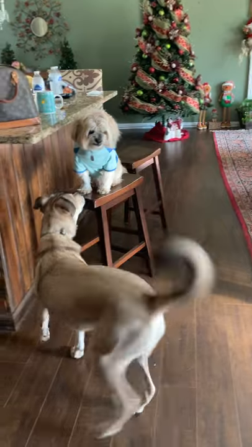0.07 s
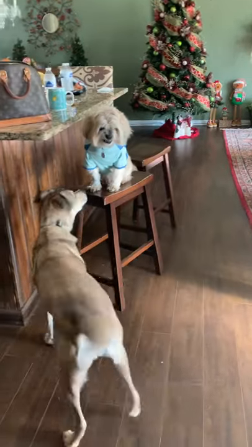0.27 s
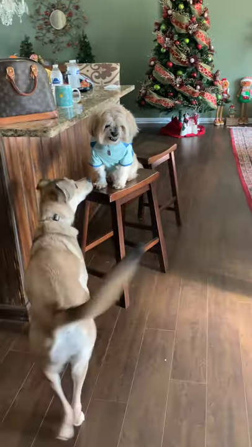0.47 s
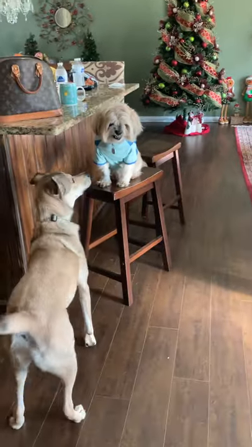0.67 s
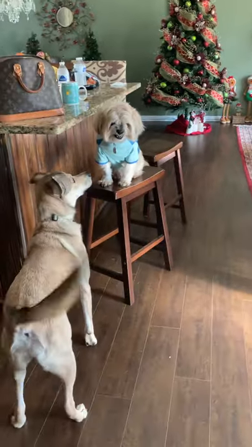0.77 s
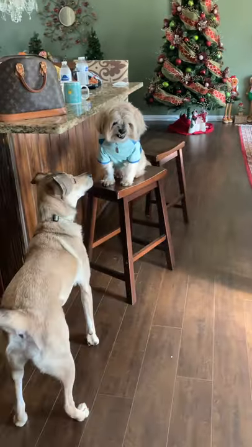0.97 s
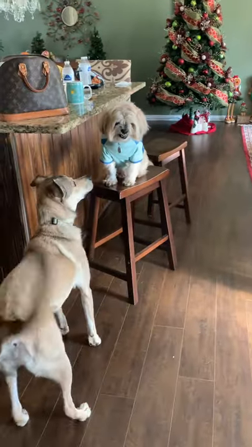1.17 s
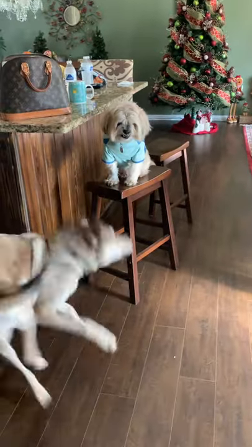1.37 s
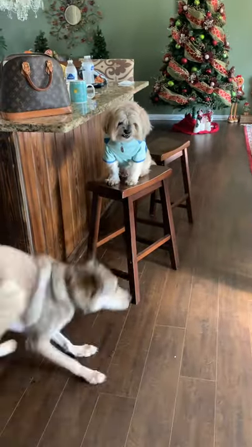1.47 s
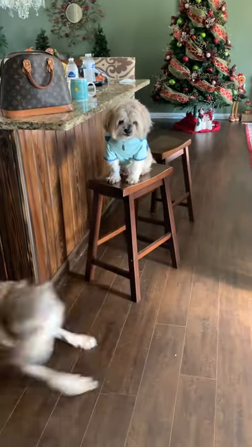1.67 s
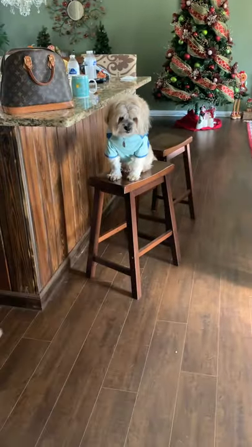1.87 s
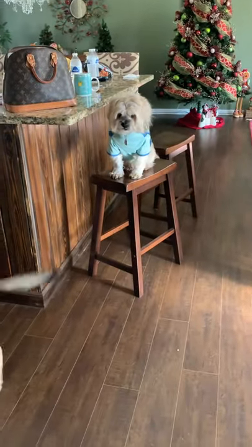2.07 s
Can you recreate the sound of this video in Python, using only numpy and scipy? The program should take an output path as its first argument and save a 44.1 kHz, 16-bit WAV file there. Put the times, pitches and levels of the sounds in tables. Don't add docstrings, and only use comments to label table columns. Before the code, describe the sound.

A dog's paws patter on an indoor wood floor, claws scrape, then two hard thumping landings

```python
import sys
import numpy as np
from scipy import signal
from scipy.fft import rfft, irfft, next_fast_len
from scipy.io import wavfile
from scipy.ndimage import uniform_filter1d

SR = 44100
rng = np.random.default_rng(int(sys.argv[2]) if len(sys.argv) > 2 else 0)


def gain_from_db(level_db):
    decades = np.asarray(level_db, float) / 20
    return 10 ** decades


def digitize_waveform(pressure):
    field = np.atleast_2d(pressure).T
    bounded = np.clip(field, -1, 1)
    quanta = np.round(bounded * 32767).astype(np.int16)
    wavfile.write(sys.argv[1], SR, quanta)


N = 93977

# freq_hz, level_db
AIR_SPECTRUM = [(25, -16), (60, -4), (100, -13.5), (200, -7.5), (450, -21.5), (750, -18.5), (1300, -41),
                (6000, -64), (14000, -48)]
# freq_hz, t60_s
ROOM_DECAY = [(60, 0.11), (250, 0.97), (1000, 0.62), (3000, 0.48), (7000, 0.36), (14000, 0.19)]
# freq_hz, level_db, t60_s
BOARD_MODES = [(71, 1, 0.3), (172, -39, 0.25), (223, -38, 0.74), (373.4, 6.5, 0.22), (580, -28, 0.26),
               (427.7, 4.5, 0.25), (790, -14, 0.1), (850, -4, 0.048), (970, -3.5, 0.022), (1450, -33, 0.12),
               (1600, -40, 0.18)]
# freq_hz, level_db
DULL_TONE = [(300, -11), (600, -7), (1500, -9.5), (2500, -6.5), (4500, -17.5), (7000, -26.5),
             (16000, -42.5)]
# freq_hz, level_db
BRIGHT_TONE = [(300, -34.5), (2300, -3.5), (3600, -1.5), (5500, -4), (7200, -4), (9500, -4), (13000, -7.5),
               (17000, -36)]
# freq_hz, level_db
THUMP_SPECTRUM = [(30, -25), (55, 2.5), (85, 5.5), (120, -15.5), (200, -15), (400, -32)]
# start_s, level_db, pitch_hz, decay_ms
BLOW_PINGS = [(0.0363, -40, 1608, 4.7), (.058, -25.5, 537, 3), (0.311, -25.5, 2010, 3.1),
              (.316, -39, 737, 3.5), (.358, -28, 2120, 2.1), (.362, -36.5, 905, 1.9),
              (1.005, -56, 3300, .6), (1.0055, -52, 4600, .5), (1.006, -54, 6100, .5),
              (.742, -57, 13000, .5), (.063, -34, 295, 3.3), (.109, -34.5, 235, 6.7), (.172, -35, 270, 8.7),
              (.227, -43, 190, 14), (.418, -37.5, 1930, 1.9), (.424, -41.5, 1100, 4.4),
              (.5715, -32, 2130, 2), (1.3695, -18.5, 533, 4.7), (1.514, -17, 957, 4.6),
              (1.545, -25.5, 385, 4.7), (1.665, -40, 760, 12), (1.71, -33, 770, 9.9), (1.76, -31.5, 750, 6),
              (1.80, -31.5, 428, 7.4), (1.85, -26.5, 346, 7.5), (2.005, -34, 1804, 12),
              (1.368, -14, 12800, 0.37), (1.368, -14, 15500, .3), (1.512, -13, 12700, 0.66),
              (1.59, -29, 111, 13), (1.612, -24, 166, 8.5), (1.60, -29.5, 402, 12), (.318, -32, 563, 6),
              (1.069, -44, 752, 12), (1.1708, -7, 3580, 0.37), (1.1707, -17.5, 8050, 0.67),
              (1.1933, -10.5, 6600, 0.74), (1.205, -10, 3930, .6), (1.224, -19.5, 7170, 3.2),
              (1.230, -19, 7640, 2.3), (1.253, -23, 8000, 0.66), (1.3704, -31, 7200, 1),
              (1.369, -19, 1410, 1.24), (1.5131, -9.5, 6400, 1.3), (1.513, -17, 1715, 4.1),
              (1.517, -16, 8100, 1.4), (1.516, -14, 370, 8.6)]
# time_s, level_db, brightness_0_to_1
DRAG_STROKES = [(.03, -48, 0.17), (.10, -58.5, 0.99), (.14, -64, 0.7), (.26, -75.5, 1), (0.502, -60.5, 1),
                (0.552, -48.5, 0.85), (.62, -54.5, 0.13), (.85, -67, 0), (.93, -83.5, 1),
                (1.118, -77, 0.74), (1.162, -35, 0.54), (1.239, -25, 0.84), (1.254, -31, 0.69),
                (1.275, -50, 0), (1.47, -40.5, 0.3), (1.499, -34.5, 0.74), (1.507, -40, 1),
                (1.53, -33.5, 0.53), (1.649, -33.5, 0.69), (1.722, -52, 0.64), (1.948, -49, 0.35),
                (2.048, -38.5, 0.56), (2.13, -54.5, 0.4)]
# start_s, level_db, decay_ms, brightness_0_to_1
CLAW_TICKS = [(.037, -44.5, 1.6, 0), (.095, -36, 6.4, 0.69), (.202, -44.5, 3, 0.76), (0.31, -27, 2.35, 0.1),
              (.358, -32, 5.1, 0), (0.417, -34.5, 1.7, 0.71), (.571, -33.5, 5.2, 0.37),
              (1.006, -72, 0.49, 0.9), (1.144, -37.5, 1.4, 0.5), (1.1707, -10, 1.1, 1),
              (1.1927, -14.5, 0.39, 1), (1.205, -23.5, 2.7, 0.41), (1.223, -39, 4.6, 0.75),
              (1.368, -16, 1.25, 0.88), (1.5116, -13.5, 2.4, 0.9), (1.516, -9.5, 1.84, 0.72),
              (1.696, -26.5, 6.1, 0.84), (1.753, -33, 3.3, 1), (1.848, -32.5, 5.6, 0.67),
              (2.008, -32, 4.7, 0.65)]
# start_s, level_db, pitch_hz, decay_ms
PLANK_KNOCKS = [(.037, -45.5, 1670, 5.2), (.058, -35, 560, 2.4), (.120, -50, 1220, 5.5),
                (.293, -47, 814, 7.9), (.311, -26.5, 2006, 7.2), (.315, -28.5, 697, 4.2),
                (.357, -27.5, 2000, 1.9), (.361, -27, 806, 2.4), (.417, -23.5, 2130, 2.4),
                (.422, -30.5, 940, 3.5), (.571, -27, 2252, 5.1), (1.068, -47, 730, 7.7),
                (1.145, -37, 585, 4.7), (1.367, -22, 786, 6.1), (1.512, -16.5, 1100, 3.9),
                (1.515, -20.5, 369, 5.6), (1.60, -33.5, 779, 14.6), (1.695, -34, 620, 4.5),
                (1.755, -32.5, 610, 3.2), (1.797, -33.5, 400, 11.3), (1.848, -29, 508, 3.1),
                (1.985, -37, 423, 13.4), (2.035, -36, 485, 5)]
# start_s, level_db, delay_s (at 1 Hz), tone_factor
PAD_LANDINGS = [(0.056, -29.5, 0.23, 1.25), (0.114, -32.5, .2, 1.1), (0.171, -38, .18, 2.34),
                (0.216, -55, 0.19, 2.2), (0.41, -37.5, .15, 2.16), (0.521, -40.5, .2, 1.43),
                (.562, -45.5, .16, 1), (1.171, -41, 0.29, 1.76), (1.204, -38, .24, 1.17),
                (1.28, -37, 0.17, 2.8), (1.369, -14.5, 0.25, 1.28), (1.402, -22.5, 0.15, 0.93),
                (1.429, -25, .16, 2), (1.477, -32, .16, 1.46), (1.509, -10.5, .28, 1.107),
                (1.581, -24, .14, 0.96), (1.652, -47, .18, 0.95), (1.705, -32.5, .24, 1.33),
                (1.786, -40, .2, 2.5), (1.839, -16, 0.3, 0.96), (2.021, -27, 0.26, 1.09),
                (2.094, -34, 0.26, 0.97)]
# freq_hz, phase_rad
PORT_PHASE = [(0, 0), (900, 1.2), (1650, 0), (2450, -3.1), (3400, -4.4), (5000, -9.4), (7300, -12.57),
              (12350, -18.85), (14400, -21.9), (17300, -22.3)]
# freq_hz, likeness_0_to_1
ROOM_LIKENESS = [(60, .985), (300, .8), (900, .5), (1500, .25), (2600, .45), (3700, .15), (5000, .72),
                 (9000, .94)]
# freq_hz, likeness_0_to_1
DIRECT_LIKENESS = [(300, 1), (1000, .85), (5000, .9), (13500, .93), (15000, .78)]


def evened(x):
    return x / np.sqrt(np.mean(x ** 2) + 1e-20)


def read(points, hz):
    f, value = np.transpose(points)
    return np.interp(np.log(hz + 1), np.log(f + 1), value)


def add(mix, start_s, sound):
    part = mix[round(start_s * SR):][:len(sound)]
    part += sound[:len(part)]


def colour(x, table):
    log_gain = np.log(gain_from_db(read(table, np.abs(np.fft.fftfreq(4096, 1 / SR)))))
    spectrum = np.exp(np.conj(signal.hilbert(log_gain)))
    taps = np.fft.ifft(spectrum).real[:2048]
    return signal.oaconvolve(x, taps / np.linalg.norm(taps))[:len(x)]


def background():
    air_db, hum_hz, hum_peak_db, waver_db = -61, 59.6, -48, 2
    air = np.array([evened(colour(a, AIR_SPECTRUM)) for a in rng.standard_normal((2, N))])
    waver = evened(uniform_filter1d(uniform_filter1d(rng.standard_normal(N), 3000), 3000))
    hum = gain_from_db(hum_peak_db + waver_db * waver) * np.sin(2 * np.pi * hum_hz * np.arange(N) / SR)
    return gain_from_db(air_db) * air + hum * np.array([[1], [0]])


def room(x):
    low_db, low_hz = -4, 190
    taps = np.zeros((2, SR))
    at = np.arange(200, SR - 20, 20) + rng.integers(0, 20, (2, (SR - 201) // 20))
    np.put_along_axis(taps, at, rng.choice([-1., 1.], at.shape), 1)
    hz, t, z = signal.stft(taps, SR, nperseg=512)
    hz = hz[:, None]
    z *= gain_from_db(-60 * t / read(ROOM_DECAY, hz) + low_db / (1 + (hz / low_hz) ** 2))
    tail = signal.istft(z, SR, nperseg=512)[1]
    tail[:, :200] = 0
    return signal.fftconvolve(x[None], tail / np.linalg.norm(tail[0]), axes=1)[:, :N]


def board_ring(x):
    t = np.arange(16000) / SR
    ring = np.zeros(len(t))
    for mode_hz, db, t60_s in BOARD_MODES:
        ring += gain_from_db(db - 60 * t / t60_s) * np.sin(2 * np.pi * mode_hz * t) * 14 / (t60_s * SR)
    return signal.fftconvolve(x, ring)[:N]


def pings():
    out, t = np.zeros(N), np.arange(3000) / SR
    for start_s, db, pitch_hz, decay_ms in BLOW_PINGS:
        u = t * 1000 / max(decay_ms, .1)
        envelope = np.minimum(6 * u, 1) * np.exp(-u)
        add(out, start_s, gain_from_db(db) * envelope * np.sin(2 * np.pi * pitch_hz * t))
    return out


def drag():
    grains_per_s, spread_db = 5200, 3.5
    time_s, db, bright = np.transpose(DRAG_STROKES)
    t = np.arange(N) / SR
    size = gain_from_db(spread_db * np.minimum(rng.exponential(1, N), 5))
    size *= rng.random(N) < grains_per_s / SR
    slips = evened(size * rng.standard_normal(N) + 0.83 * rng.standard_normal(N))
    slips *= gain_from_db(np.interp(t, time_s, db))
    b = np.clip(np.interp(t, time_s, bright), 0, 1)
    return colour(slips * (1 - b), DULL_TONE) + colour(slips * b, BRIGHT_TONE)


def claws():
    dull, bright, t = np.zeros(N), np.zeros(N), np.arange(800) / SR
    for start_s, db, decay_ms, brightness in CLAW_TICKS:
        noise = rng.standard_normal(800)
        burst = gain_from_db(db) * noise * np.exp(-t * 1000 / max(decay_ms, .1))
        share = np.clip(brightness, 0, 1) ** 2
        add(dull, start_s, burst * (1 - share))
        add(bright, start_s, burst * share)
    return colour(dull, DULL_TONE) + colour(bright, BRIGHT_TONE)


def landings(hz):
    out = np.zeros(N)
    for start_s, db, delay_s, tone in PAD_LANDINGS:
        band = (hz < 1200) * (hz > 15)
        bending = np.exp(-4j * np.pi * delay_s * np.sqrt(hz))
        wave = irfft(gain_from_db(read(THUMP_SPECTRUM, hz / tone)) * band * bending)[:6000]
        add(out, start_s, gain_from_db(db) * wave / np.abs(wave).max())
    return out


def knocks(hz):
    octaves, delay_s = 1.16, 0.08004
    out, t = np.zeros(N), np.arange(1500) / SR
    for start_s, db, pitch_hz, decay_ms in PLANK_KNOCKS:
        rough = rng.standard_normal(1500) * np.exp(-t * 1000 / decay_ms)
        blow = rfft(rough, 8192) * np.exp(-4j * np.pi * delay_s * np.sqrt(hz))
        width = octaves * np.minimum(1, 36 / decay_ms ** 2)
        wave = irfft(blow * np.exp(-(np.log2((hz + 1) / pitch_hz) / width) ** 2))[:6000]
        travel_s = delay_s / np.sqrt(2 * pitch_hz)
        add(out, start_s - travel_s, gain_from_db(db) * wave / np.abs(wave).max())
    return out


def paws():
    hz = np.fft.rfftfreq(8192, 1 / SR)
    blows = landings(hz) + knocks(hz)
    return blows + board_ring(blows)


def scene():
    room_db, ping_room_db, left_trim_db = -2.5, -6, -.7
    tones = pings()
    wide = drag() + claws() + paws()
    ambience = gain_from_db(room_db) * room(wide + gain_from_db(ping_room_db) * tones) + background()

    size = next_fast_len(N + 999)
    hz = np.fft.rfftfreq(size, 1 / SR)
    direct = rfft(wide + tones, size)
    shared, own = rfft(ambience, size)
    same, alike = read(ROOM_LIKENESS, hz), read(DIRECT_LIKENESS, hz)
    turn = np.exp(1j * np.interp(hz, *np.transpose(PORT_PHASE)))
    scatter = np.exp(1j * (hz / 900 + 2 * np.sin(hz / 330) + 2 * np.sin(hz / 190)) - .002j * hz)

    left = (direct + shared) * gain_from_db(left_trim_db)
    right_direct = direct * (alike + np.sqrt(1 - alike ** 2) * scatter)
    right = (right_direct + same * shared) * turn + np.sqrt(1 - same ** 2) * own
    return irfft(np.array([left, right]), size)[:, :N]


def low_pass(x):
    return signal.sosfilt(signal.butter(12, 17150, fs=SR, output="sos"), x)


def record(dry):
    start_s, fade_s = .0365, 0.00016
    sharp_db, weak_db, edge_hz, sharp_edge_hz = 6, -8, 15950, 17000
    t = np.arange(N) / SR
    x = dry * np.clip((t - start_s) / fade_s, 0, 1)
    sum_diff = np.array([x[0] + x[1], x[0] - x[1]]) / 2
    hz, _, z = signal.stft(sum_diff, SR, nperseg=512, noverlap=384)
    hz = hz[:, None]
    power = abs(z) ** 2 + 1e-18

    treble_db = 10 * np.log10(power[:, 70:170].mean((0, 1)))
    jump_db = treble_db - uniform_filter1d(treble_db, size=13)
    sharp = (jump_db > sharp_db / 2) * (treble_db > -66)
    sharp = uniform_filter1d(1. * sharp, size=3) > .1

    bands = uniform_filter1d(uniform_filter1d(power, size=5, axis=1), size=9, axis=2)
    weak = (bands < bands[::-1] * gain_from_db(2 * weak_db)) * (hz > 4400) * ~sharp
    cut = hz > np.where(sharp, sharp_edge_hz, edge_hz)
    mid, side = signal.istft(z * ~(weak | cut), SR, nperseg=512, noverlap=384)[1][:, :N]
    return low_pass(np.array([mid + side, mid - side]) * (t > start_s - .001))


dry = scene()
out = record(dry)
digitize_waveform(out)
```